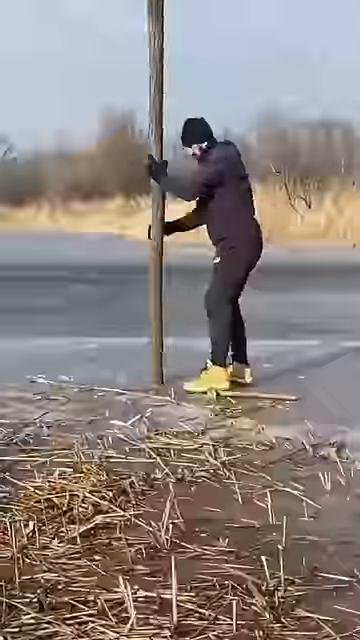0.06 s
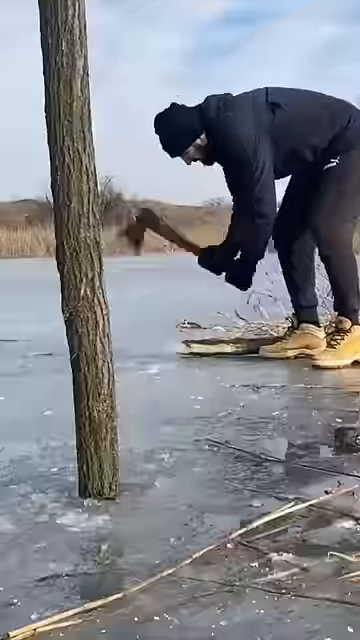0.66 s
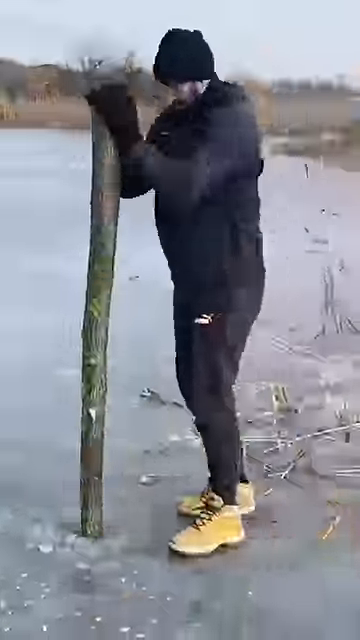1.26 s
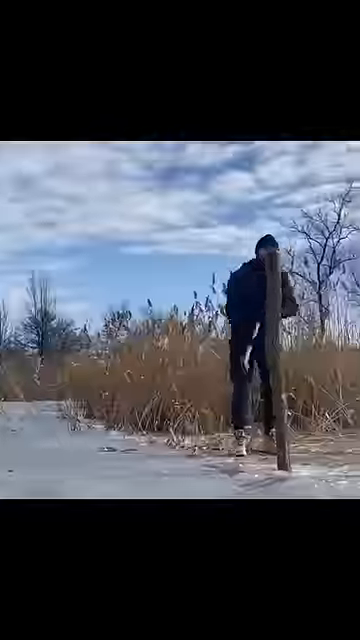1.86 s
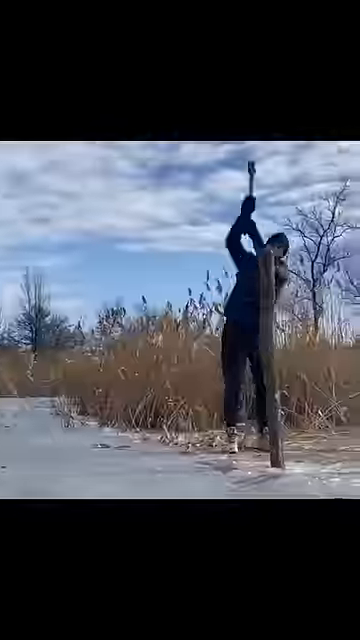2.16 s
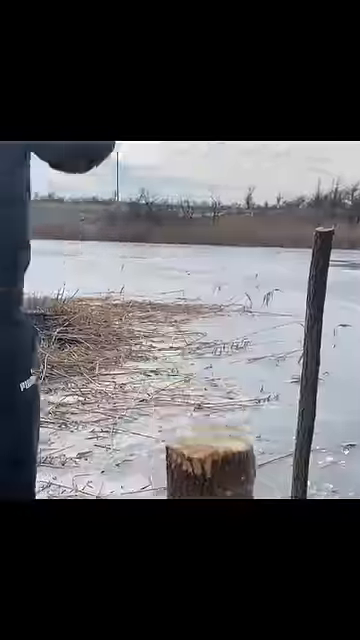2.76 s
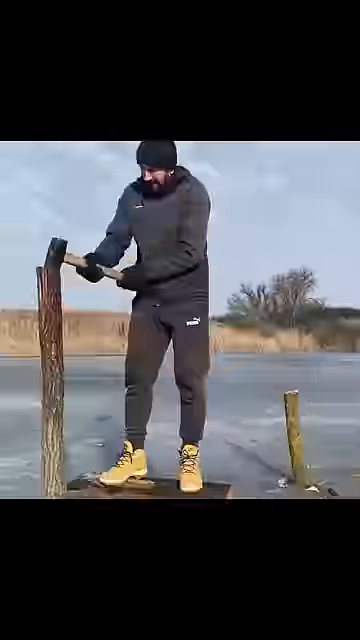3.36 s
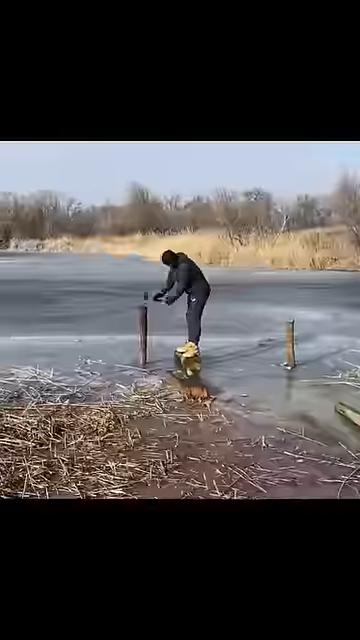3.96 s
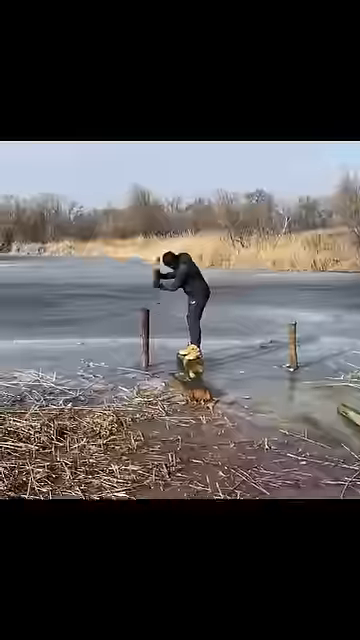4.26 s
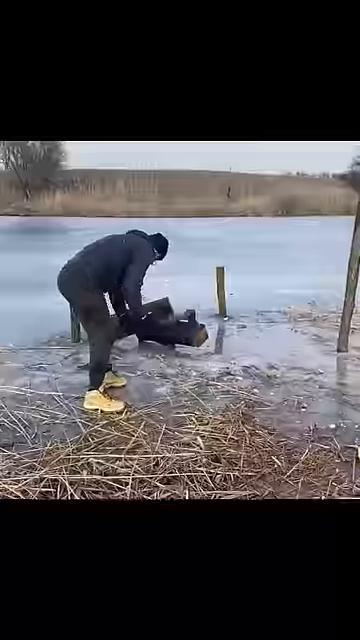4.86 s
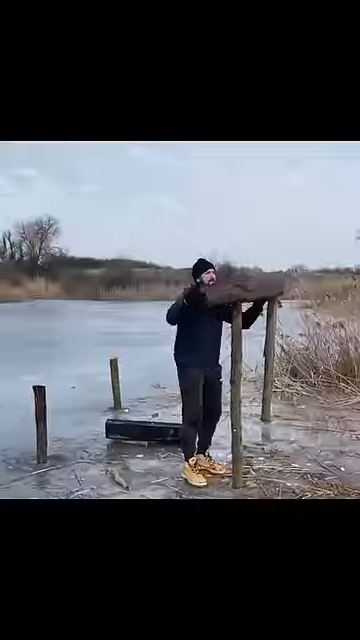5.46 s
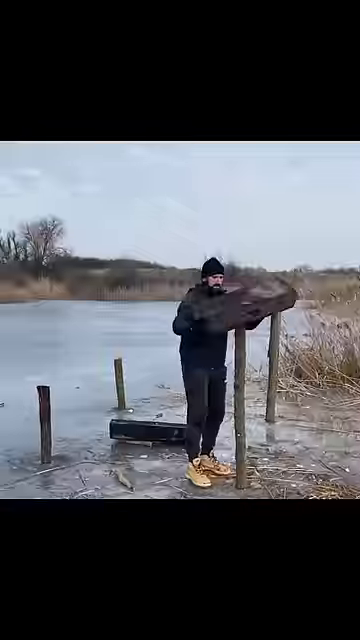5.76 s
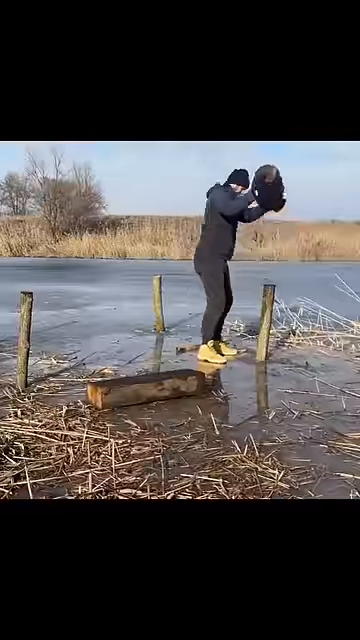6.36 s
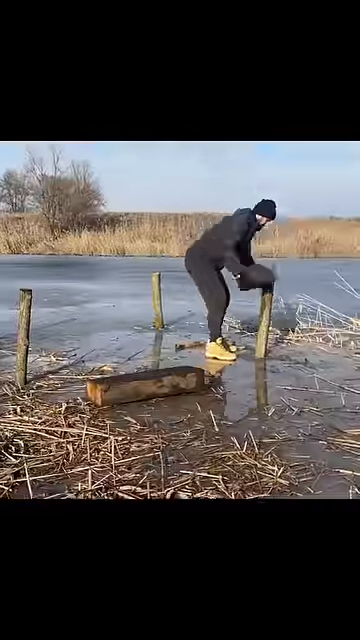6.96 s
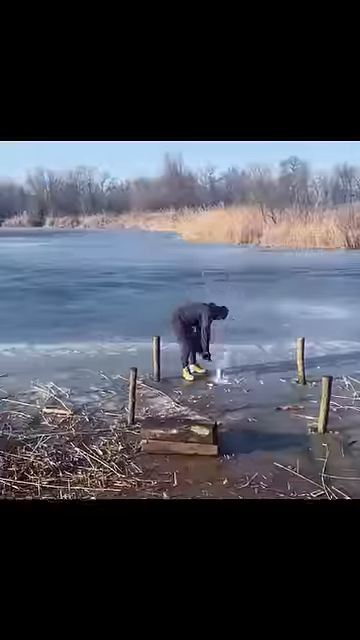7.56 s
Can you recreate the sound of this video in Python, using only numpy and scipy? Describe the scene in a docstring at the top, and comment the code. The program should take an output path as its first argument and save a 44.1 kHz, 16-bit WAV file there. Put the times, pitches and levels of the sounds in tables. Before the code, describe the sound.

Sped-up hatchet, sledgehammer and log blows click and knock on ice and wooden posts outdoors, over faint crunching and a soft burble of wind.

```python
"""A hatchet chops a frozen pond, then a sledge and a log drive posts into the ice, all in fast motion.
The speed shrinks every blow to a click of a few ms, coloured by the ice or wood that rings under it,
and the shore returns a faint echo. Splinters patter and boots crunch in between.
Behind the work, buffets of wind, lifted to a low burble, swell over the hush of open air."""
import sys
import numpy as np
from scipy import signal
from scipy.fft import rfft, irfft, next_fast_len
from scipy.io import wavfile
from scipy.ndimage import uniform_filter1d

SR = 44100
rng = np.random.default_rng(int(sys.argv[2]) if len(sys.argv) > 2 else 0)


def dump_mix(stems):
    """Bounce the given channels to the path in sys.argv[1] as a 16-bit WAV at rate SR."""
    frames = np.atleast_2d(stems).T  # one column per channel
    limited = np.clip(frames, -1, 1)  # hard clip at full scale
    pcm = np.round(limited * 32767).astype(np.int16)
    wavfile.write(sys.argv[1], SR, pcm)


N = 340011
HIT_SAMPLES = 8192

# resonances of each thing struck: (frequency [Hz], level [dB])
WET_LOG = [(130, -33.5), (4690, -0.5), (5250, -14.5), (8310, -17.5), (9730, -32), (12450, -41),
           (13700, -31.5), (15980, -45)]
THICK_ICE = [(130, -46), (220, -19), (520, -15), (3010, 1.5), (5080, 1), (5900, -6), (8610, -3.5),
             (8830, -9.5), (10420, 0), (15980, -7.5)]
STAKE = [(130, -35), (520, -24), (780, -9.5), (2410, -5.5), (3790, -11.5), (4310, 2.5), (6070, -8),
         (7190, -4), (8830, -16), (11800, -15), (13390, -30), (13870, -9.5), (15330, -20.5), (15980, -40)]
STUMP = [(130, -36), (390, -37.5), (2200, -19.5), (2670, -24.5), (4310, -7.5), (5560, -8.5), (6720, -15.5),
         (7360, -7), (9090, 0), (9910, -17.5), (11240, -12.5), (12660, -28), (14170, -13.5), (15980, -18)]
POST = [(130, -36.5), (820, -18.5), (1210, -24), (1720, -10), (2200, -18.5), (3620, -8.5), (4090, 2),
        (4780, -13.5), (6890, -18.5), (7620, -3), (8910, -21.5), (10810, -12.5), (14860, -24.5),
        (15980, -32.5)]
FAR_POST = [(130, -31.5), (690, -3.5), (1290, 2), (2070, -14), (3920, 0.5), (4780, -3), (5430, 3),
            (8870, -3.5), (10160, -15.5), (13180, -7), (15980, -21.5)]
BRITTLE_ICE = [(130, -31), (520, 0), (1420, -2.5), (1680, 1), (3790, -3), (7580, 5), (15500, 6),
               (15980, -7)]
TALL_POST = [(130, -35), (340, -24), (560, -3.5), (2370, -7.5), (2760, -15.5), (2890, -32.5), (3060, -25.5),
             (5770, -23.5), (6420, -0.5), (6890, -16.5), (7240, -16), (11370, -39.5), (15720, -27),
             (15980, -43)]
SHORT_POST = [(130, -46.5), (260, -35.5), (520, -6), (780, -1), (990, 1.5), (1340, -3), (1720, -13),
              (3230, -15.5), (4130, -30.5), (5940, -3), (7320, -34), (7580, -22.5), (11200, -16),
              (15980, -32.5)]
THIN_ICE = [(130, -30), (520, -20), (1500, 3.5), (4200, -2), (6200, 4), (8500, 1), (11500, 1), (14000, 4),
            (15980, -5)]
# stretches of work: (start [s], thing struck, contact [ms], rattle [dB], rebound delay [ms],
# rebound [dB], echo [dB], left over right [dB])
JOBS = [(0, BRITTLE_ICE, 0.42, -1.5, 4.2, -20, -56, 1.5), (.5, WET_LOG, 1.36, -4, 4.85, -12.5, -29.5, 3.5),
        (.66, THICK_ICE, 0.6, -8, 3.2, -36, -41.5, 2.1), (1.3, STAKE, 0.66, -24.5, 10.8, -30, -39.5, -1.8),
        (2.27, STUMP, 0.44, -20, 4.9, -22.5, -57, -3), (2.95, POST, 0.69, -24.5, 4.2, -23.5, -43.5, 3.3),
        (3.75, FAR_POST, 0.52, -16, 4.5, -25, -39.5, 1.4),
        (4.35, BRITTLE_ICE, .5, -17, 2.4, -6.5, -36.5, 0.5),
        (5.36, TALL_POST, 0.7, -20, 5, -25, -53.5, -3.5), (5.8, SHORT_POST, 0.7, -14, 4.8, -29, -48, -2),
        (7.08, THIN_ICE, .4, -10, 4, -17.5, -39, -.7)]


def blow(strike, job, job_grain, fresh=0.73, rattle_ms=4.0, bend_ms=1.2, echo_ms=42, echo_width_ms=17):
    """One stereo hit: bite, rattle, rebound and shore echo, all ringing through the thing struck."""
    _, level_db, weight_db, snap_db = strike
    _, body, contact_ms, rattle_db, rebound_ms, rebound_db, echo_db, pan_db = job
    hz = np.fft.rfftfreq(HIT_SAMPLES, 1 / SR)
    ms = np.arange(HIT_SAMPLES) * 1000 / SR
    own_grain, stray_grain, debris, shore = rng.standard_normal((4, HIT_SAMPLES))
    bite = contact(job_grain + fresh * own_grain, contact_ms)
    # the head rocks and lands again within a millisecond, carving new notches into every blow
    bite = unit(bite + rng.choice([-.45, .45]) * np.roll(bite, rng.integers(12, 44)))
    stray = contact(stray_grain, contact_ms)
    rattle = gain_of(rattle_db) * unit(debris * np.exp(-ms / rattle_ms))
    rebound = gain_of(rebound_db) * np.roll(stray, np.searchsorted(ms, rebound_ms))
    echo = gain_of(echo_db) * unit(shore / np.cosh(np.minimum(abs(ms - echo_ms) / echo_width_ms, 20)) ** 2)
    # the way to the shore and back swallows treble
    dull_echo = rfft(echo) * gain_of(curve_at([(4000, 0.002), (9000, -6)], hz))
    side = gain_of(-19) * rfft(stray) * np.sqrt(hz / 5000)  # wider the shorter the wave
    drive = rfft(bite + rattle + rebound) + dull_echo + np.array([side, -side])
    # each blow lands on a slightly different spot, and wet wood and ice damp every resonance
    detune = 1 + .004 * rng.standard_normal()
    body_db = uniform_filter1d(curve_at(body, hz * detune), size=41)
    tone_db = curve_at([(1200, weight_db), (3500, 0.0071), (5500, 0), (10000, snap_db)], hz)
    # bending waves travel faster the higher they are, so each click is a quick downward chirp
    chirp = np.exp(-4j * np.pi * bend_ms * np.sqrt(hz / 1000))
    # the bass stays centred; the louder side leads by 2.5 microseconds per dB
    pan = gain_of(pan_db * np.minimum(hz / 4500, 1)) * np.exp(2j * np.pi * hz * pan_db * 2.5 / 1e6)
    pair = irfft(drive * ringing(body_db + tone_db) * chirp * np.array([pan ** .5, pan ** -.5]))
    return gain_of(level_db) * np.sqrt(2 * .003 * SR) * unit(pair)  # level taken over 3 ms


def contact(grain, contact_ms):
    """A burst of tiny fractures as the tool bites, flattened to hold nearly every frequency."""
    age = np.arange(HIT_SAMPLES) * 1000 / SR / contact_ms
    burst = rfft(unit(grain * age * np.exp(-age ** 2)))
    ripple_db = 10 * np.log10(uniform_filter1d(abs(burst) ** 2, size=25) + .05)
    return unit(irfft(burst * ringing(-0.99 * ripple_db)))


def blows(strikes, lead_ms=0.37, bounce_s=.0245):
    """Blows of one job share a grain and land alike; the log bounces once on the short post."""
    out = np.zeros((2, N))
    grains = rng.standard_normal((len(JOBS), HIT_SAMPLES))
    fade = np.minimum(np.linspace(2, 0, HIT_SAMPLES), 1) ** 2
    for strike in strikes:
        k = job_at(strike[0])
        _, body, contact_ms, *_ = JOBS[k]
        start = strike[0] - (lead_ms + contact_ms) / 1000
        add(out, start, blow(strike, JOBS[k], grains[k]) * fade)
        if body is SHORT_POST:
            bounce = (strike[0], -40.5, 10.5, 7)  # time, then level, weight and snap in dB
            add(out, start + bounce_s, blow(bounce, JOBS[k], grains[k]) * fade)
    return out


def work_rhythm(uneven_db=0.5, uneven_tone_db=3.14):
    """Every strike as (time, level, weight, snap): single knocks, then steady runs of uneven force."""
    # lone blows, and the log's first hard bounce off the short post at 5.862 s: (time [s], level over 3 ms
    # [dB], bass weight [dB], treble snap [dB])
    singles = [(.0072, -23.5, -1.5, -10), (.2103, -34.5, -12, -21), (.2287, -25.5, -6, -6.5),
               (.5553, -10.5, -.5, 8), (.591, -21.5, 7, 11), (.6164, -32, 19.5, 38.5),
               (.9806, -14.5, 2.5, 2), (1.3822, -10.5, -4.5, 5), (1.619, -14, -9, 11.5),
               (1.7754, -11.5, -3, -3.5), (1.9935, -8, -8.5, 7), (2.2137, -12, -10.5, 2),
               (2.9829, -11.5, -7.5, -2), (4.426, -31, 4.5, -3.5), (5.4218, -8, -4, -0.5),
               (5.5847, -9, -6, -2), (5.744, -10.5, -5.5, 4.5), (5.8399, -17, 2, 6), (5.862, -29, -4, -28),
               (6.036, -17.5, 4.5, -3), (6.2209, -13.5, 1, -2), (6.425, -13, -1.5, -6),
               (6.5721, -11, 0, 0.5), (6.7701, -10, -9.5, -15), (6.9711, -12.5, 0.5, 0.5),
               (7.1531, -27, -4, -1)]
    # blows on a beat: (first [s], last [s], rate [1/s], level over 3 ms [dB], growth over the run [dB],
    # bass weight [dB], treble snap [dB])
    runs = [(.707, 0.8869, 11, -15.5, 2.5, 4, -1.5), (2.3274, 2.9214, 10, -13.5, -1, 4, -3.5),
            (3.0698, 3.7109, 9.4, -11, -2, -2.5, -1), (3.7993, 3.9751, 11.4, -15.5, 1.5, 1, 1),
            (4.0672, 4.2404, 11.5, -13, 2, -5, 3.5), (4.7629, 4.9424, 11.2, -20.5, 3.5, 5, -3.5),
            (5.032, 5.3036, 11, -22, -3, -1, -6.5), (7.2425, 7.6674, 11.8, -25.5, 4, -5.5, -2.5)]
    strikes = list(singles)
    for first, last, per_s, level_db, growth_db, weight_db, snap_db in runs:
        for progress in np.linspace(0, 1, round((last - first) * per_s) + 1):
            softness, bass, treble = rng.standard_normal(3)
            time = first + progress * (last - first)
            db = level_db + growth_db * (progress - .5) - uneven_db * softness
            strikes.append((time, db, weight_db + uneven_tone_db * bass, snap_db + uneven_tone_db * treble))
    return strikes


def job_at(time):
    """Index of the stretch of work under way at this time."""
    return sum(job[0] <= time for job in JOBS[1:])


def spray(strikes, below_chop_db=37, thin_out_s=0.066):
    """Each chop into brittle or thin ice throws splinters that patter down and thin out."""
    thinning = np.exp(-np.arange(SR)[None] / SR / thin_out_s)
    flying = np.zeros((1, N))
    for time, level_db, _, _ in strikes:
        if JOBS[job_at(time)][1] in (BRITTLE_ICE, THIN_ICE):
            add(flying, time, gain_of(level_db - below_chop_db) * thinning)
    return flying * splinters(per_s=88, size_db=4, settle_s=.0015, side_db=-10)


def scrapes(clump_db=5.0, clump_hz=500):
    """Ice crumbs crush in clumps under each short stroke of a boot or of wood."""
    # scraping strokes: (start [s], length [s], level [dB])
    strokes = [(.057, 0.032, -45.5), (0.114, .018, -58.5), (0.178, .04, -55), (0.211, 0.022, -39.5),
               (0.282, 0.092, -67.5), (0.397, 0.047, -49.5), (0.55, 0.033, -36), (1.023, 0.015, -38.5),
               (1.074, 0.078, -42.5), (1.124, 0.021, -33.5), (1.269, 0.033, -61), (1.578, 0.04, -59.5),
               (2.18, 0.021, -60), (4.326, 0.011, -52.5), (4.417, 0.032, -36), (4.98, 0.038, -53.5),
               (5.228, 0.082, -58.5), (5.793, 0.049, -60), (6.008, 0.014, -53.5), (6.532, .016, -59.5),
               (7.066, 0.027, -55.5), (7.467, 0.059, -53), (7.661, 0.031, -45.5)]
    t = np.arange(SR // 2)[None] / SR
    force = np.zeros((1, N))
    for start, length, db in strokes:
        progress = t / length
        add(force, start, gain_of(db) * (progress / 0.31) ** 2 * np.exp(2 - 2 * progress / 0.37))
    grains = rng.standard_normal((2, N)) * gain_of(clump_db * wander(N, clump_hz))
    return force * crumb_tone(grains, side_db=-14)


def chips():
    """Now and then a stray splinter of ice ticks on the pond."""
    return gain_of(-77) * splinters(per_s=5, size_db=2, settle_s=0.0019, side_db=-8)


def splinters(per_s, size_db, settle_s, side_db):
    """Bits of ice land at random, each a tiny burst of noise that dies at once."""
    t = np.arange(HIT_SAMPLES) / SR
    splinter = rng.standard_normal(HIT_SAMPLES) * np.exp(-t / settle_s)
    landings = signal.oaconvolve(ticks(per_s, size_db), splinter[None], axes=1)[:, :N]
    return crumb_tone(landings, side_db)


def crumb_tone(grains, side_db):
    """Gives grains the crisp colour of broken ice and spreads them in stereo."""
    # ice crumbs: (frequency [Hz], level [dB])
    spectrum = [(200, -26.5), (500, -1.5), (1500, 2.5), (2600, -4), (5000, 1), (8000, -2), (12000, 0),
                (16000, -12)]
    return spread(coloured(grains, spectrum), side_db)


def wind(rush_db=-8, small_eddy_pitch=1.46):
    """Eddies hit the microphone as separate lumps over a smooth rush; small ones sound higher."""
    # burble of the large eddies: (frequency [Hz], level [dB])
    buffet = [(40, -54.5), (100, -34.5), (180, -20), (280, -6), (400, 3), (520, 5), (800, -4.5),
              (1150, -12), (1600, -21), (2300, -33.5), (5000, -56.5)]
    # small, fast eddies: (time [s], share of the power [0-1])
    small_eddies = [(0, 0.13), (1, 0.08), (2, 0.37), (3, 0.048), (4, 0.039), (5, 0.017), (6, 0.2),
                    (7.1, 0.58), (7.7, 0.87)]
    share = np.clip(np.interp(np.arange(N) / SR, *np.transpose(small_eddies)), 0, 1)
    puff = signal.windows.hann(round(.0035 * SR))[None]
    out = np.zeros((2, N))
    for part, pitch in ((1 - share, 1), (share, small_eddy_pitch)):
        lumps = signal.oaconvolve(abs(ticks(per_s=300, size_db=0)), puff, "same", axes=1)
        eddies = (evened(lumps) + gain_of(rush_db)) * rng.standard_normal((2, N))
        burble = coloured(eddies, [(hz * pitch, db) for hz, db in buffet])
        out += np.sqrt(part) * spread(burble, side_db=-13)
    return wind_strength() * out


def wind_strength(edge_db=-16.5, gust_shape=1.9, flutter_db=3, flutter_hz=9.9):
    """An uneven breeze with gusts on top, each down to edge_db one rise before and one fall after its peak."""
    # breeze between gusts: (time [s], level [dB])
    breeze_levels = [(0, -64), (.33, -75.5), (.47, -66.5), (.72, -62.5), (1.35, -54.5), (1.7, -60),
                     (2.1, -59.5), (2.7, -68.5), (3.0, -53.5), (3.35, -64.5), (4.65, -65.5), (5.7, -64),
                     (5.9, -58.5), (6.3, -65), (6.95, -67.5), (7.35, -50.5), (7.71, -40.5)]
    # swells of wind: (peak time [s], rise [s], fall [s], level [dB])
    gusts = [(0.454, 0.055, .04, -52), (1.19, 0.11, .052, -30), (2.388, 0.021, .03, -54.5),
             (3.141, .09, .12, -50), (3.773, 0.023, 0.023, -39.5), (3.877, 0.012, 0.034, -32),
             (3.99, 0.13, 0.14, -35), (4.219, 0.22, 0.16, -45), (4.908, 0.17, 0.23, -35),
             (5.239, 0.12, 0.094, -42), (7.135, 0.084, 0.052, -31.5)]
    t = np.arange(N) / SR
    coarse_t = t[::64]
    gust_power = np.zeros(len(coarse_t))
    for peak, rise, fall, db in gusts:
        away = np.clip(np.maximum((peak - coarse_t) / rise, (coarse_t - peak) / fall), 0, 10)
        gust_power += gain_of(db + edge_db * away ** gust_shape) ** 2
    breeze = gain_of(np.interp(t, *np.transpose(breeze_levels)) + flutter_db * wander(N, flutter_hz))
    return np.sqrt(breeze ** 2 + np.interp(t, coarse_t, gust_power))


def air(flicker_db=4, flicker_hz=12):
    """The faint, restless hush of the open pond."""
    # colour of the hush: (frequency [Hz], level [dB])
    spectrum = [(60, -32), (150, -16), (400, 3), (900, -9.5), (1600, -12.5), (3000, -9.5), (8000, -15.5),
                (16000, -14)]
    # its slow drift: (time [s], level [dB])
    levels = [(0, -74), (0.699, -67), (2.6, -73), (4.202, -71), (5.5, -77.5), (6.8, -72.5), (7.7, -73.5)]
    hush = spread(coloured(rng.standard_normal((2, N)), spectrum), side_db=-10)
    drift_db = np.interp(np.arange(N) / SR, *np.transpose(levels))
    return gain_of(drift_db + flicker_db * wander(N, flicker_hz)) * hush


def ticks(per_s, size_db):
    """Two rows of random clicks at the same moments: many small, few large."""
    chance = rng.random(N)
    strength = np.minimum(rng.exponential(1, N), 3)
    return rng.standard_normal((2, N)) * (chance < per_s / SR) * gain_of(size_db * strength)


def wander(n, hz):
    """Smooth random drift of rms 1, rolling off above hz."""
    padded = next_fast_len(n, True)
    smooth = np.exp(-np.minimum(np.fft.rfftfreq(padded, 1 / SR) / hz, 10) ** 2)
    return evened(irfft(rfft(rng.standard_normal(n), padded) * smooth, padded)[:n])


def ringing(db):
    """Causal response with this gain curve: its peaks ring on after the blow."""
    log_gain = np.log(gain_of(np.concatenate([db, db[-2:0:-1]])))
    return np.exp(np.conj(signal.hilbert(log_gain)))[:len(db)]


def coloured(x, points):
    """Equalises x with a (Hz, dB) curve, at rms 1."""
    n = x.shape[-1]
    padded = next_fast_len(n, True)
    gains = gain_of(curve_at(points, np.fft.rfftfreq(padded, 1 / SR)))
    return evened(irfft(rfft(x, padded) * gains, padded)[..., :n])


def curve_at(points, hz):
    """Joins (Hz, value) points by straight lines on a log-frequency axis."""
    point_hz, value = np.transpose(points)
    return np.interp(np.log(hz + 1), np.log(point_hz + 1), value)


def spread(pair, side_db):
    """Turns mid and side into left and right, at rms 1."""
    side = gain_of(side_db) * pair[1]
    return evened(np.array([pair[0] + side, pair[0] - side]))


def add(mix, time, sound):
    """Adds a sound to the mix at a time in seconds."""
    part = mix[:, max(round(time * SR), 0):][:, :sound.shape[1]]
    part += sound[:, :part.shape[1]]


def gain_of(db):
    """Decibels to amplitude."""
    return 10 ** (np.asarray(db) / 20)


def evened(x):
    """Scales to rms 1."""
    return x / np.sqrt(np.mean(x ** 2) + 1e-20)


def unit(x):
    """Scales to energy 1."""
    return x / np.sqrt(np.sum(x ** 2) + 1e-20)


def scene():
    """Blows, splinter spray, scrapes and chips over wind and open air."""
    strikes = work_rhythm()
    return blows(strikes) + spray(strikes) + scrapes() + chips() + wind() + air()


def record(dry, ceiling=0.78, cutoff_hz=16600):
    """Soft-clips the tallest peaks, then trims the extreme treble."""
    rounded = dry / (1 + (dry / ceiling) ** 6) ** (1 / 6)
    lowpass = signal.firwin(255, cutoff_hz, window=("kaiser", 9), fs=SR)
    return signal.oaconvolve(rounded, lowpass[None], "same")


dry = scene()
out = record(dry)
dump_mix(out)
```